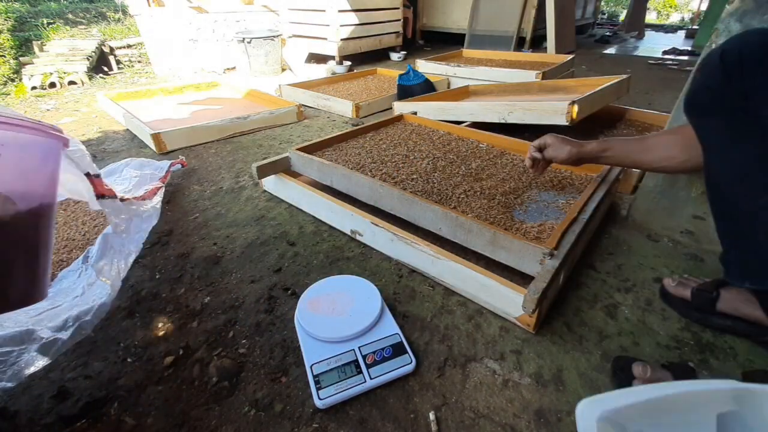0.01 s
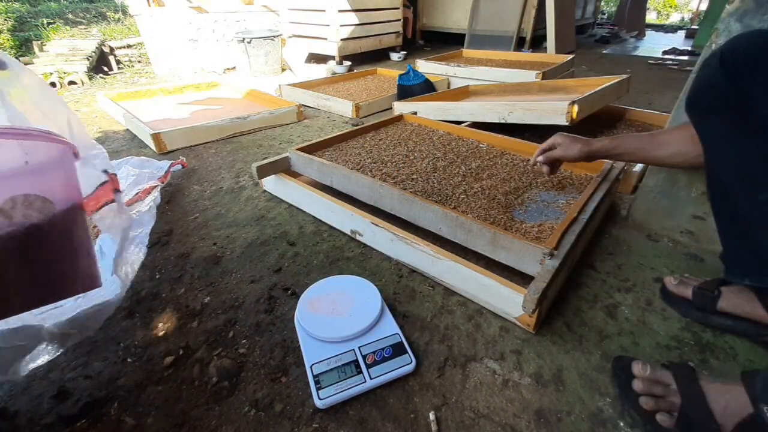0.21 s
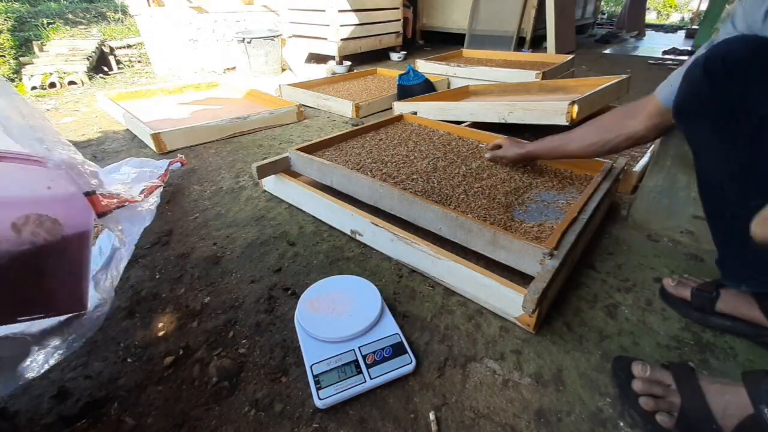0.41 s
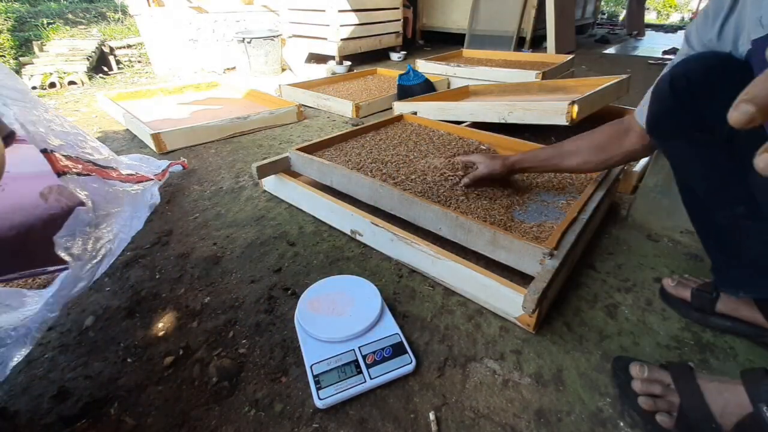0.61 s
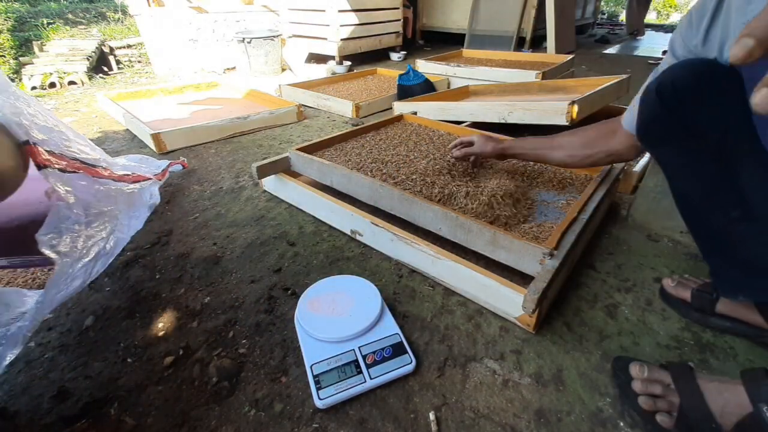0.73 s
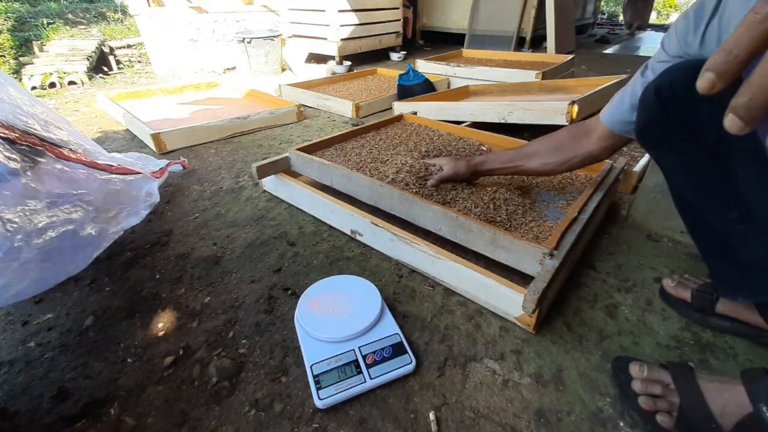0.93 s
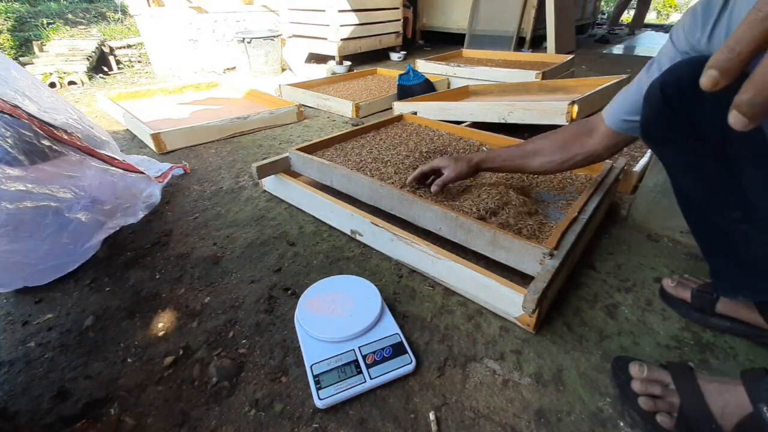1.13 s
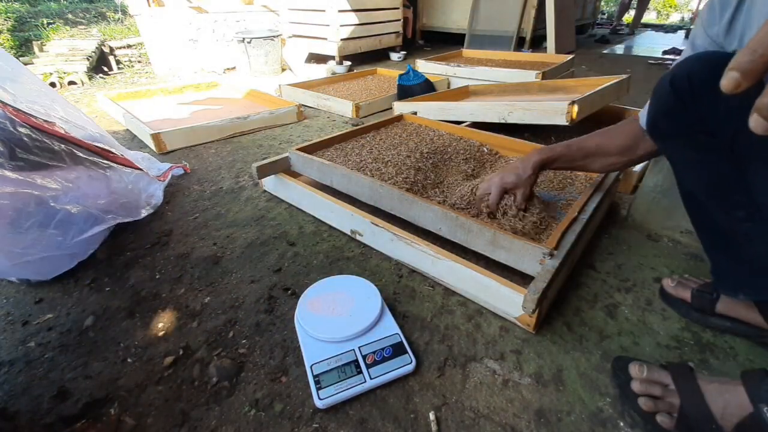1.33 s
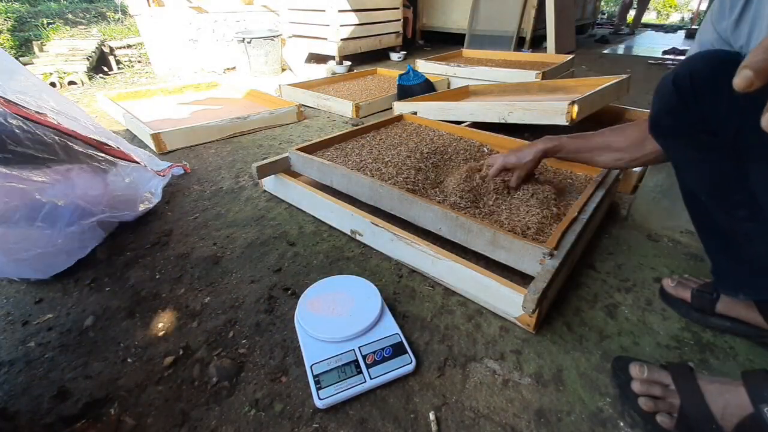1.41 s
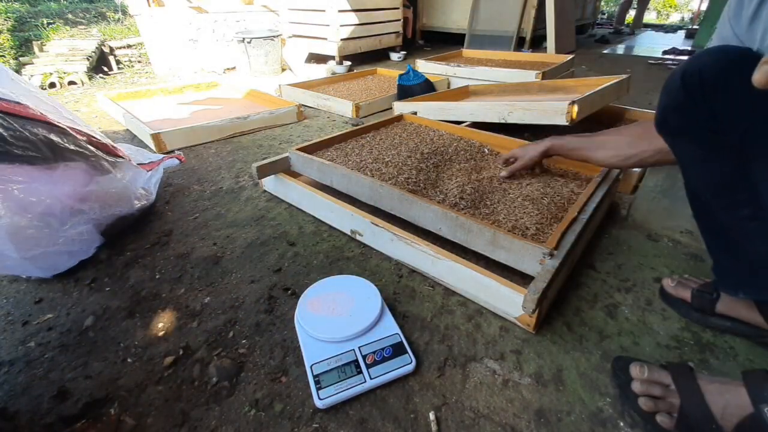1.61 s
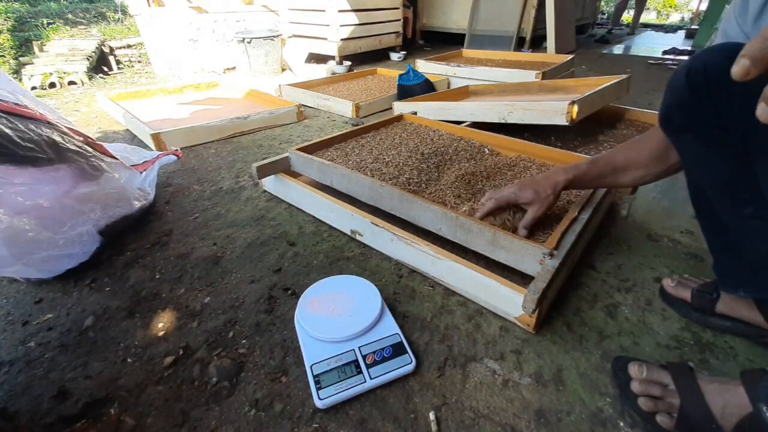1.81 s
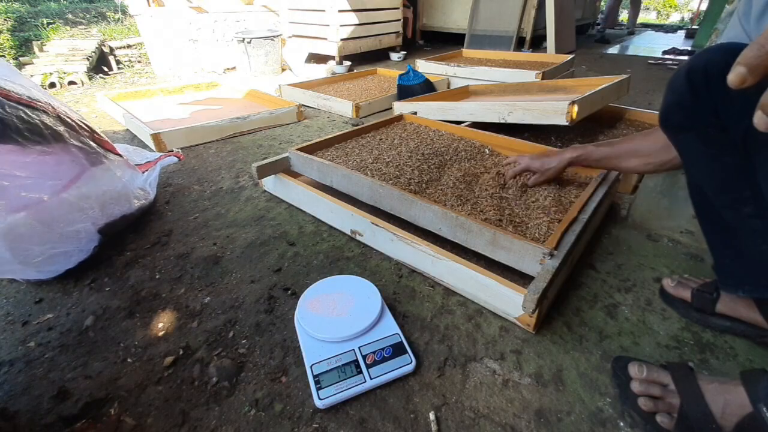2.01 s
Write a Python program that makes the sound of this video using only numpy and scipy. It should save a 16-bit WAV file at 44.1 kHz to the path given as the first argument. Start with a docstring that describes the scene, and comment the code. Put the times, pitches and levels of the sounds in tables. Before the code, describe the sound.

A plastic jug knocks twice against a container with a hollow clack and rattles as it settles. A hand then rakes small worms across a wooden tray in soft, dry strokes, close by, over a low outdoor rumble.

```python
"""Under an open shed, close to a stereo pair of microphones, a plastic jug of small worms is lowered
into a plastic bag. It knocks twice against a container, wall clacking and hollow ringing, and rattles
as it settles. A hand rakes worms across a wooden tray in dry, soft strokes of tiny husk clicks, with a
dull rub, a scrape or a crinkle of the bag now and then. Low outdoor rumble and a faint hum lie beneath."""
import sys
import numpy as np
from scipy import signal
from scipy.fft import rfft, irfft
from scipy.io import wavfile
from scipy.ndimage import uniform_filter1d

SR = 44100
rng = np.random.default_rng(int(sys.argv[2]) if len(sys.argv) > 2 else 0)


def generate_wav(sig):
    """Save sig (samples, or channels by samples) to the path in sys.argv[1] as 16-bit PCM at SR."""
    pcm = np.round(np.clip(np.atleast_2d(sig).T, -1, 1) * 32767).astype(np.int16)
    wavfile.write(sys.argv[1], SR, pcm)


N = 92610
SLIPS_PER_S = 900
WORMS_LAG_S = -0.0003  # negative: the tray's sound reaches the left microphone first


def amp(db):
    """Decibels to gain."""
    return 10 ** (np.asarray(db) / 20)


def unit_rms(x):
    """Scales to rms 1."""
    return x / np.sqrt(np.mean(x ** 2) + 1e-20)


def curve_at(points, hz):
    """Reads a table on a log-frequency axis."""
    f, value = np.transpose(points)
    return np.interp(np.log(hz + 1), np.log(f + 1), value)


def add(mix, start_s, sound):
    """Mixes a sound in at a time."""
    part = mix[..., max(round(start_s * SR), 0):][..., :sound.shape[-1]]
    part += sound[..., :part.shape[-1]]


def coloured(x, colour):
    """Gives a steady signal a spectrum, at rms 1."""
    n = x.shape[-1]
    gain = amp(curve_at(colour, np.fft.rfftfreq(n, 1 / SR)))
    return unit_rms(irfft(rfft(x) * gain, n))


def placed(x, phase, left_db):
    """A source at two microphones; phase is the left one's lead at each frequency."""
    turn = np.exp(.5j * phase) * amp(left_db / 2)
    return irfft(rfft(x) * np.array([turn, 1 / turn]), N)


def spread(trains, shared, lag_s, left_db):
    """One shared train from the source's direction plus one scattered train per microphone."""
    phase = -2 * np.pi * np.fft.rfftfreq(N, 1 / SR) * lag_s
    direct = placed(trains[0], phase, left_db)
    scattered = trains[1:] * amp([[left_db / 2], [-left_db / 2]])
    return np.sqrt(shared) * direct + np.sqrt(1 - shared) * scattered


def grains(per_s, spread_db):
    """Three random trains of tiny clicks of uneven size."""
    shape = (3, N)
    clicks = (rng.random(shape) < per_s / SR) * rng.choice([-1., 1.], shape)
    return clicks * amp(spread_db * np.minimum(rng.exponential(1, shape), 4))


def background(air_db=-51, waver=0.9, waver_hz=14):
    """Outdoor rumble and a wavering distant hum."""
    # Each row: frequency in Hz, relative level of the rumble in dB.
    air = [(28, -41), (46, -2), (90, -4.5), (122, 4.5), (200, -10), (320, -6), (450, -24), (800, -26),
           (2000, -33), (16000, -53)]
    # Each row: frequency of a hum line in Hz, level in dB.
    hum = [(122, -58.5), (163, -61), (259, -57.5)]
    t, hz = np.arange(N) / SR, np.fft.rfftfreq(N, 1 / SR)
    rumble = coloured(rng.standard_normal((3, N)), air)
    out = amp(air_db) * spread(rumble, shared=0.77, lag_s=0, left_db=4.0)
    slow_band = np.exp(-(hz / waver_hz) ** 2)
    for line_hz, db in hum:
        drift = unit_rms(irfft(rfft(rng.standard_normal((2, N))) * slow_band, N))
        line = (1 + waver * (drift[0] + 1j * drift[1])) * np.exp(2j * np.pi * line_hz * t)
        out += amp(db) * unit_rms(line.real)
    return out


def dull_rubs():
    """Runs of slips on jug and tray swell quickly and fade, heard through a hollow body."""
    # Each row: start in seconds, length in seconds, level in dB.
    rubs = [(0., 0.035, -33), (1.188, 0.07, -49), (1.376, 0.079, -39.5), (1.482, 0.054, -41),
            (1.982, 0.0105, -36.5), (2.008, .1, -54.5)]
    # Each row: frequency in Hz, relative level of the rub in dB.
    rub_colour = [(50, -51), (120, -7.5), (310, 1), (520, -9), (750, -19.5), (2600, -45.5), (16000, -43)]
    pressure = np.zeros(N)
    for start, length, db in rubs:
        arch = np.sin(np.pi * np.linspace(0, 1, int(length * SR))).clip(0)
        add(pressure, start, amp(db) * np.sqrt(arch))
    slips = coloured(grains(SLIPS_PER_S, spread_db=-1.5), rub_colour)
    return pressure * spread(slips, shared=.75, lag_s=0, left_db=1)


def ringing(modes, rise_s, pitch=1):
    """The dying modes of a struck part; pitch shifts them all, as the plastic flexes."""
    t = np.arange(SR // 2) / SR
    ring = sum(amp(db - 60 * t / t60) * np.sin(2 * np.pi * hz * pitch * t) for hz, db, t60 in modes)
    return ring * (1 - np.exp(-t / rise_s))


def burst(colour, t60_s, rise_s=.0001, size=4096):
    """A dense cluster of quickly dying modes with a rounded start."""
    t = np.arange(size) / SR
    cluster = irfft(np.exp(2j * np.pi * rng.random(size // 2 + 1)))
    onset = 1 - np.exp(-(t / rise_s) ** 2)
    return coloured(cluster, colour) * amp(-60 * t / t60_s) * onset


def jug_knocks(wall_rise_s=0.00055, wall_t60_s=0.027, low_cut_hz=102):
    """Each contact cracks, clacks the wall and rings the hollow jug; rebounds only ring the hollow."""
    # Each row: start in seconds, levels of hollow ring, wall clack and crack in dB, pitch ratio.
    knocks = [(0.0113, -33, -36, -60, 0.76), (.2225, -28, -12, -14, .97), (.2256, -9.3, -23, -26, 1.06),
              (.228, -5.5, -26, -25, 1.03), (.2459, -18, -50, -55, 1), (.2587, -21, -52, -55, 1),
              (.3093, -22, -21.5, -48, 1.04), (.3129, -18, -21.5, -43, 1.04), (.3203, -18, -32, -52, .97),
              (0.5284, -26.5, -31, -46, 1.0), (0.546, -29, -40, -60, 1.145)]
    # The jug rocks softly. Each row: start in seconds, level in dB.
    rebounds = [(.181, -29), (.198, -25), (.366, -26), (.423, -30), (.475, -33.5), (.517, -33)]
    # Modes of the hollow plastic. Each row: frequency in Hz, relative level in dB, t60 in seconds.
    hollow = [(164, -17, .2), (253.7, -10.8, .06), (347, -7, .05), (393.5, -8.5, .12), (478.2, 2.6, .052),
              (573, -12.5, .07)]
    # Modes of the stiff wall. Each row: frequency in Hz, relative level in dB.
    wall = [(767, 1), (1034, 1.5), (1162, 1.5), (1397, -3.5), (1700, -5), (2295, -6), (3045, -27)]
    # Spectra of wall clack and contact crack. Each row: frequency in Hz, relative level in dB.
    clack = [(400, -20), (800, -10), (1450, -7.5), (2100, -16.5), (3100, -16.5), (4500, -27.5),
             (16000, -45)]
    crack = [(150, -41), (1000, -3), (2300, 4), (3500, 2), (5000, -6), (7600, 3.5), (9000, -9),
             (16000, -12)]
    # Each row: frequency in Hz, phase lead at the left microphone in radians.
    left_lead = [(100, -0.49), (250, -0.6), (1000, -1.02), (2200, -2.2), (4500, -1.63)]
    wall_modes = [(hz, db, wall_t60_s) for hz, db in wall]
    out = np.zeros(N)
    for start, ring_db, clack_db, crack_db, pitch in knocks:
        add(out, start, amp(ring_db) * ringing(hollow, rise_s=0.0008, pitch=pitch))
        add(out, start, amp(clack_db) * ringing(wall_modes, wall_rise_s, pitch))
        add(out, start, amp(clack_db - 6) * burst(clack, t60_s=0.044, rise_s=wall_rise_s))
        add(out, start, amp(crack_db) * burst(crack, t60_s=0.012))
    for start, db in rebounds:
        add(out, start, amp(db) * ringing(hollow, rise_s=.009))
    out = signal.sosfilt(signal.butter(2, low_cut_hz, "high", fs=SR, output="sos"), out)
    return placed(out, curve_at(left_lead, np.fft.rfftfreq(N, 1 / SR)), left_db=.6)


def push(length, rise_s=0.013, fall_s=0.023):
    """Force of one stroke: it digs in quickly and eases off."""
    t = np.arange(0, length, 1 / SR)
    return np.clip(np.minimum(t / rise_s, (length - t) / fall_s), 0, 1)


def shifting(x, depth_db, size=1024):
    """Narrow resonances come and go as the heap changes shape."""
    spectra = signal.stft(x, nperseg=size)[2]
    patches = uniform_filter1d(rng.standard_normal(spectra.shape[1:]), size=4, axis=0)
    patches = unit_rms(uniform_filter1d(patches, size=6, axis=1))
    return unit_rms(signal.istft(spectra * amp(depth_db * patches), nperseg=size)[1][:, :N])


def rustle():
    """Strokes of the hand push dry husks over one another; the worms stir and the bag crinkles."""
    # Each row: start in seconds, length in seconds, levels of husk fizz and sliding mass in dB.
    strokes = [(0.026, 0.15, -47, -44.5), (0.169, 0.14, -46, -44), (0.395, 0.15, -56.5, -51.5),
               (0.544, 0.057, -45, -44.5), (0.592, 0.085, -49, -45.5), (0.663, 0.14, -55, -60.5),
               (0.947, 0.23, -56.5, -58), (1.137, 0.24, -49.5, -48.5), (1.187, 0.087, -56, -51),
               (1.379, 0.11, -44, -41.5), (1.481, 0.085, -46, -42), (1.548, 0.11, -43.5, -43),
               (1.634, 0.089, -57, -51), (1.768, 0.09, -50.5, -49.5), (1.839, 0.048, -49, -45.5),
               (1.915, 0.048, -51, -52.5), (1.976, 0.13, -49.5, -48.5)]
    # The worms' own stirring. Each row: time in seconds, level in dB.
    wriggle = [(0, -50), (.76, -58), (0.814, -64), (.93, -59.5), (1.102, -50.5), (2.1, -56)]
    # Spectra of dry husks and sliding mass. Each row: frequency in Hz, relative level in dB.
    fizz_colour = [(500, 10), (2000, -20.5), (3500, -5.5), (5200, -4.5), (7400, 3), (9000, -5.5),
                   (10300, -3), (12200, 0.5), (14000, -6.5), (16000, -7)]
    slide_colour = [(80, -11), (300, 6), (520, -5.5), (850, -3.5), (1220, -1.5), (1600, -4.5), (2250, -5.5),
                    (3300, -9.5), (5000, -11), (16000, -36)]
    # Single crinkles of the bag. Each row: start in seconds, level in dB, t60 in seconds.
    crinkles = [(.399, -38, .06), (.518, -36, .015), (0.994, -38.5, .02), (1.927, -29.5, .008),
                (1.932, -38, .03)]
    fizz_level, slide_level = np.zeros((2, N))
    for start, length, fizz_db, slide_db in strokes:
        add(fizz_level, start, amp(fizz_db) * push(length))
        add(slide_level, start, amp(slide_db) * push(length))
    stir_level = amp(np.interp(np.arange(N) / SR, *np.transpose(wriggle)))
    fizz = coloured(grains(per_s=7000, spread_db=2.0), fizz_colour)
    fizz = spread(fizz, shared=0.077, lag_s=WORMS_LAG_S, left_db=1.7)
    slide = coloured(grains(per_s=4400, spread_db=2.5), slide_colour)
    slide = spread(slide, shared=0.15, lag_s=WORMS_LAG_S, left_db=1.0)
    out = shifting(fizz, depth_db=0.5) * np.hypot(fizz_level, stir_level)
    out += shifting(slide, depth_db=2.5) * np.hypot(slide_level, stir_level)
    for start, db, t60 in crinkles:
        add(out, start, amp(db) * np.array([burst(fizz_colour, t60), burst(fizz_colour, t60)]))
    return out


def handling_bumps():
    """Soft low swells of handling, alike at both microphones."""
    # Each row: start in seconds, frequency in Hz, level in dB, length in seconds.
    bumps = [(0.054, 78, -40.5, 0.097), (0.377, 77.6, -42, 0.048), (1.396, 111.2, -43, 0.15)]
    out = np.zeros(N)
    for start, hz, db, length in bumps:
        t = np.arange(0, length, 1 / SR)
        add(out, start, amp(db) * np.sin(np.pi * t / length) * np.sin(2 * np.pi * hz * t))
    return out


def tray_scrapes(q=6.1):
    """The hardest strokes scrape the tray floor, each with its own narrow resonance."""
    # Each row: start in seconds, length in seconds, resonance in Hz, level in dB.
    scrapes = [(1.38, 0.11, 2470, -47), (1.509, 0.052, 2730, -46), (1.556, 0.087, 1960, -44.5)]
    out = np.zeros((2, N))
    for start, length, hz, db in scrapes:
        force = np.zeros(N)
        add(force, start, amp(db) * push(length))
        resonance = signal.iirpeak(hz, q, fs=SR)
        slips = unit_rms(signal.lfilter(*resonance, grains(SLIPS_PER_S, spread_db=-1)))
        out += force * spread(slips, shared=.5, lag_s=WORMS_LAG_S, left_db=2)
    return out


def shed(x, level_db=-21.5, t60_s=0.43, rise_s=0.004):
    """A light diffuse tail comes back from the roof and stacked trays."""
    t = np.arange(SR // 2) / SR
    tail = rng.standard_normal((2, len(t))) * amp(-60 * t / t60_s) * np.minimum(t / rise_s, 1)
    tail /= np.linalg.norm(tail[0])
    return amp(level_db) * signal.fftconvolve(x, tail + .5 * tail[::-1], axes=1)[:, :N]


def scene():
    """The work close to the microphones, the shed around it, the outdoors beyond."""
    near = jug_knocks() + dull_rubs() + rustle() + tray_scrapes() + handling_bumps()
    return near + shed(near) + background()


def record(dry):
    """The recorder cuts off the highest treble."""
    edge_hz = 16150
    low_pass = signal.firwin(511, edge_hz, window=("kaiser", 9), fs=SR)
    return signal.oaconvolve(dry, low_pass[None], "same")


dry = scene()
out = record(dry)
generate_wav(out)
```